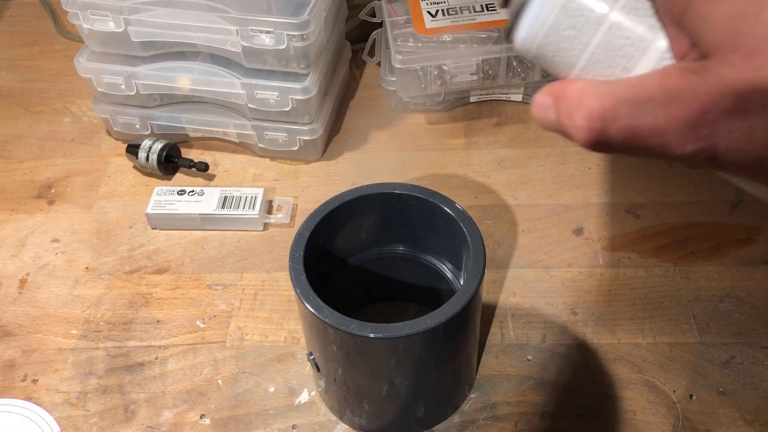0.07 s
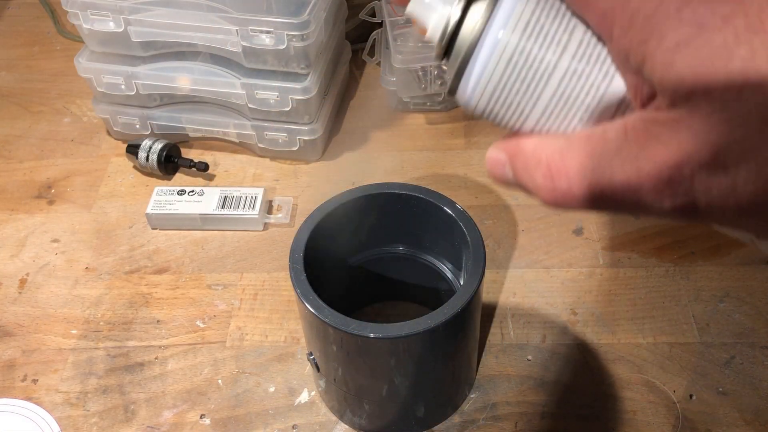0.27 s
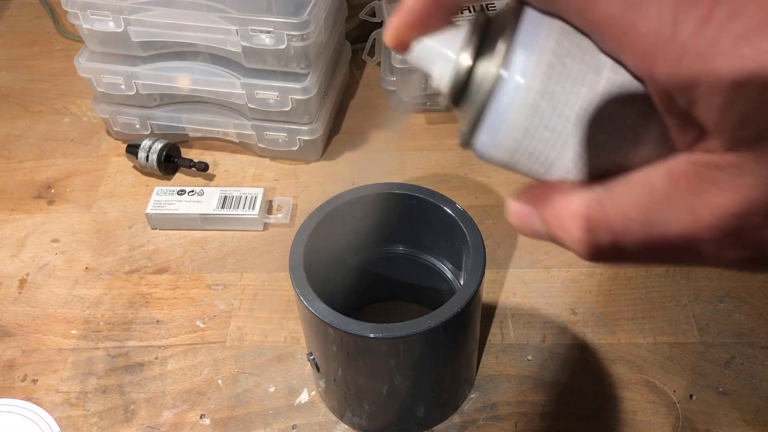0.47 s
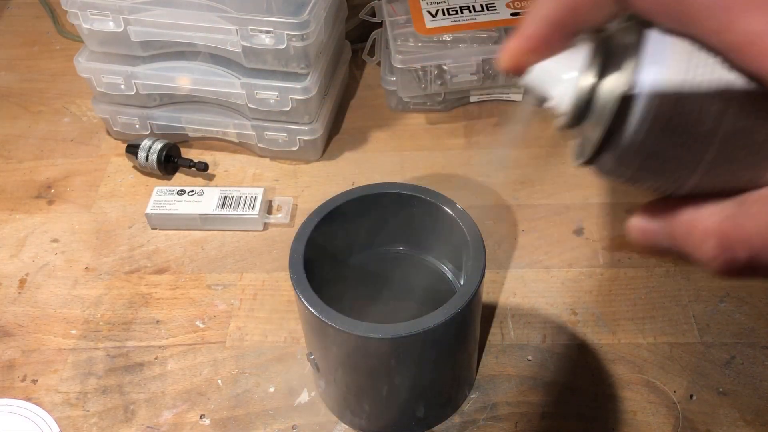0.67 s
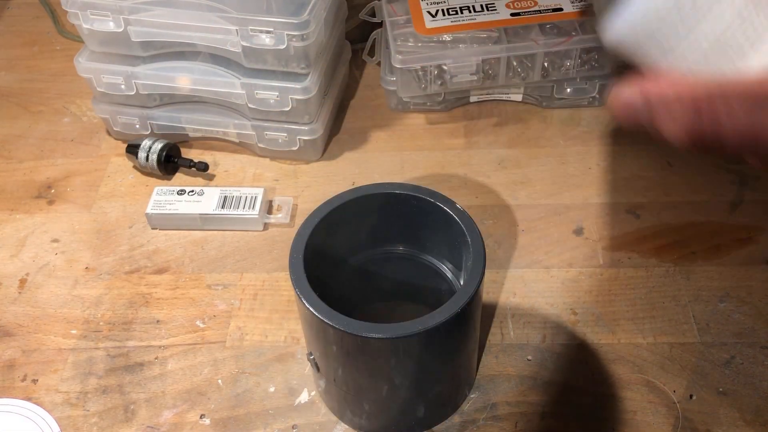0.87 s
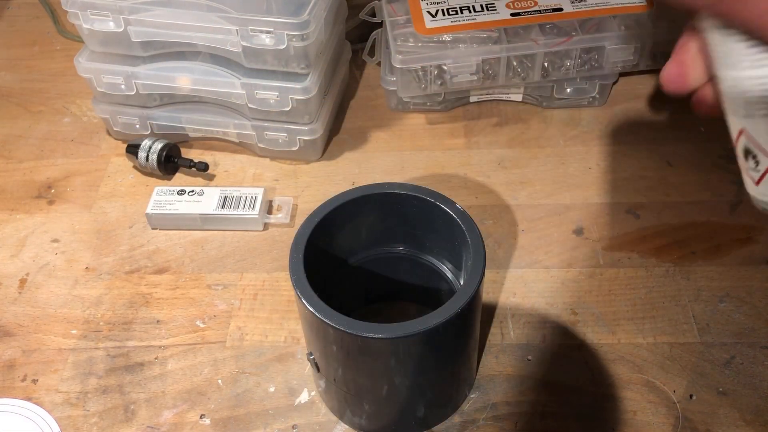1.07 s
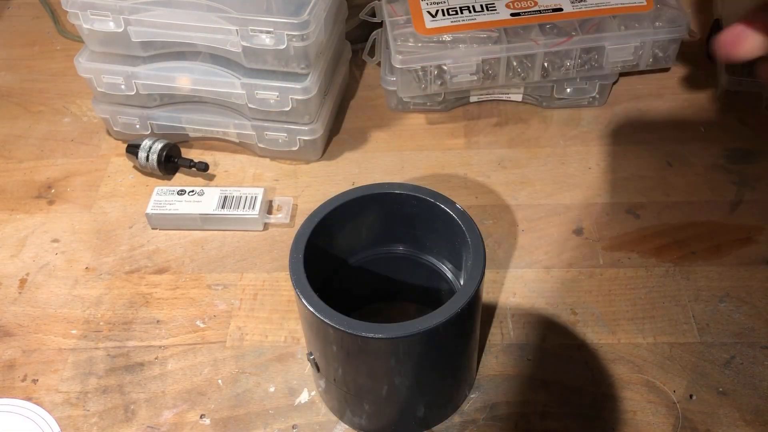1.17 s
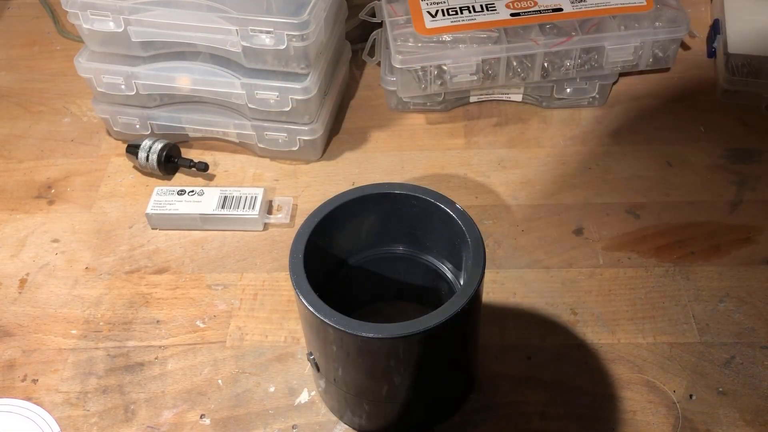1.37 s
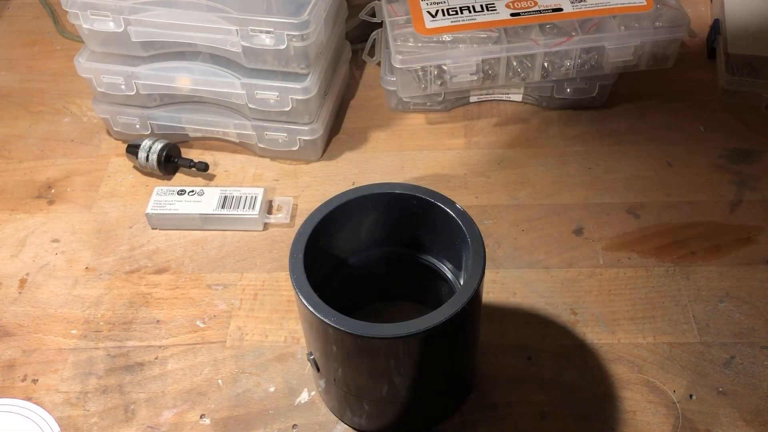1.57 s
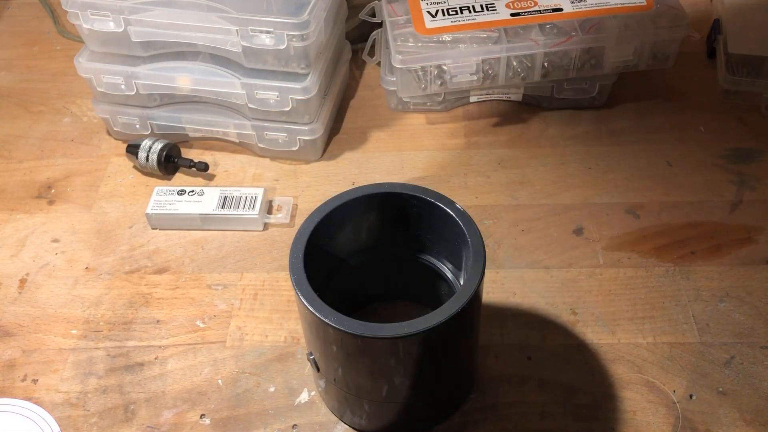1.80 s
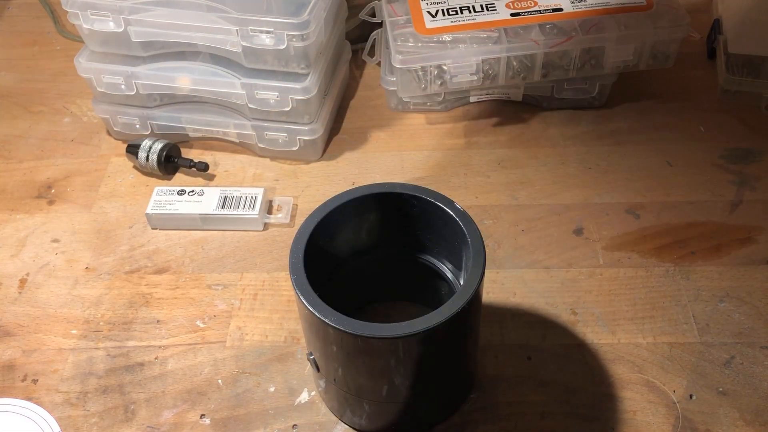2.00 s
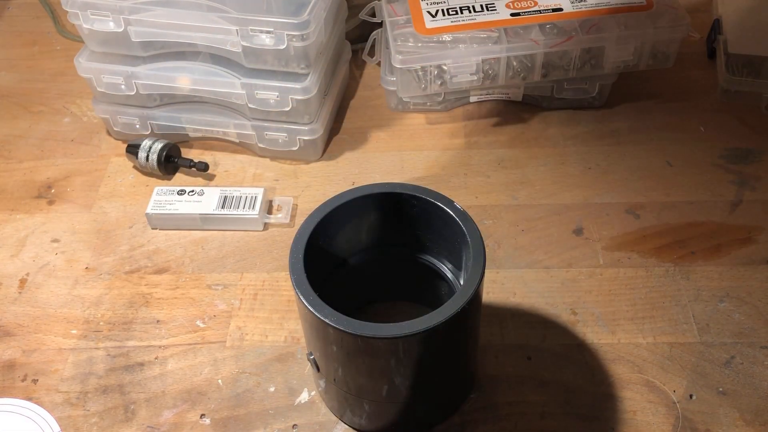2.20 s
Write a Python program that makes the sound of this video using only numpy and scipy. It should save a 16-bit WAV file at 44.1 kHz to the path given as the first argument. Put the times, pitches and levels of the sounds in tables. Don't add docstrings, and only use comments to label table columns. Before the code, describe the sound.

A loud aerosol hiss stops abruptly, followed by faint handling clicks and a can set down

```python
import sys
import numpy as np
from scipy import signal
from scipy.io import wavfile
from scipy.ndimage import uniform_filter1d, map_coordinates

SR = 44100
rng = np.random.default_rng(int(sys.argv[2]) if len(sys.argv) > 2 else 0)


def invert_db(x):
    u = np.asarray(x, float) / 20
    return 10 ** u


def int16_out(signal):
    q = np.round(np.clip(np.atleast_2d(signal).T, -1, 1) * 32767)
    wavfile.write(sys.argv[1], SR, q.astype(np.int16))


N = 99048
T = np.arange(N) / SR


def evened(x):
    return x / np.sqrt(np.mean(x ** 2) + 1e-20)


def read(points, hz):
    f, value = np.transpose(points)
    return np.interp(np.log(hz + 1), np.log(f + 1), value)


def curve(table, t=T):
    rows = np.transpose(table)
    return [np.interp(t, rows[0], col) for col in rows[1:]]


def add(mix, start_s, sound):
    part = mix[round(start_s * SR):][:len(sound)]
    part += sound[:len(part)]


def low_pass(x, order, hz):
    return signal.sosfilt(signal.butter(order, hz, fs=SR, output="sos"), x)


def high_pass(x, hz):
    return signal.sosfilt(signal.butter(2, hz, "high", fs=SR, output="sos"), x)


def resonate(x, hz, width_hz):
    turn = np.exp(2j * np.pi * np.cumsum(hz * np.ones(len(x))) / SR)
    r = np.exp(-np.pi * width_hz / SR)
    return 2 * (turn * signal.lfilter([1 - r], [1, -r], x / turn + 1e-18)).real


def noise(shape_db, patchy_db):
    frames, hz = N // 128 + 5, np.fft.rfftfreq(512, 1 / SR)
    a, b, patches = rng.standard_normal((frames, 257, 3)).T
    patches = uniform_filter1d(patches, size=5, axis=0)
    patches = evened(uniform_filter1d(patches, size=16, axis=1))
    colour_db = shape_db(hz[:, None], np.arange(frames) * 128 / SR)
    z = (a + 1j * b) * invert_db(colour_db + patchy_db * patches)
    return evened(signal.istft(z, nperseg=512, noverlap=384)[1][:N])


def ridges(hz, t):
    # start_s, end_s, from_hz, to_hz, level_db
    slides = [(-.2, .68, 9050, 7500, 4), (-.2, .25, 7760, 7500, -9.5), (-.2, 0.9, 5650, 5400, 4),
              (.2, 1.1, 5460, 5600, -9), (-.2, .32, 12350, 12470, 0.5), (.35, .8, 12250, 12150, -4.5),
              (.35, 0.44, 13070, 12650, 3.5), (.35, 0.66, 13950, 13650, 4.5), (.5, 0.86, 2400, 2700, 8),
              (0.551, 0.72, 3100, 3000, -22), (.6, 1.3, 6700, 6750, 0.5), (.65, 2.3, 9240, 9150, 2),
              (0.051, 0.28, 10000, 10350, 10.5), (.3, 0.87, 3940, 3550, -2.5), (.55, 1.3, 8160, 8500, 4)]
    width_hz = 220
    out = 0
    for start, end, from_hz, to_hz, db in slides:
        u = np.clip((t - start) / (end - start), 0, 1)
        centre_hz = from_hz + (to_hz - from_hz) * u
        swell = np.sqrt(abs(np.sin(np.pi * u)))
        out = out + db * swell * np.exp(-((hz - centre_hz) / width_hz) ** 2)
    return out


def mirror(x, table):
    share, delay_ms = curve(table)
    late = map_coordinates(x, [np.arange(N) - delay_ms * SR / 1000], order=5)
    return share * late, share


def whistle():
    pitch_hz, width_hz, centre_s, length_s = 5150, 320, .852, .005
    level_db, tail_db, t60_s = -31.5, -21, .5
    fuzz = evened(resonate(rng.standard_normal(N), pitch_hz, width_hz))
    since = T - centre_s
    puff = np.exp(-(since / length_s) ** 2) * (np.sin(2 * np.pi * pitch_hz * T) + fuzz / 2)
    tail = fuzz * (since > 0) * invert_db(tail_db - 60 * abs(since) / t60_s)
    return invert_db(level_db) * (puff + tail)


def jet():
    # time_s, level_db, thinning (0 full to 1 thin)
    valve = [
        (0, -27.5, 0),
        (.15, -29.5, 0),
        (.3, -27.5, 0.09),
        (.45, -25, 0.37),
        (.65, -23.5, 0.6),
        (.836, -23.5, 0.53),
        (.856, -26.5, 0.6),
        (.866, -39, 1),
        (.878, -69, 0.6),
        (.89, -100, 0.04),
    ]
    # pitch_hz, level_db (per Hz)
    full_jet = [(35, -50.5), (60, -44.5), (226, 0), (500, -13.5), (796, -4.5), (1080, -12), (4460, -5),
                (8570, 4.5), (14500, 7), (15700, 6)]
    thin_jet = [(35, -48.5), (60, -54), (145, -14.5), (800, -18.5), (1270, -19.5), (2490, -17), (4070, -17),
                (5500, -3.5), (14500, -1), (15700, -3.5)]
    # pitch_hz, width_hz, full_db, thin_db (against the jet)
    pipe = [(134.5, 71, -34.5, -38), (330, 130, -29.5, -36), (4094, 150, -40, -17),
            (5435, 120, -26.5, -46.5), (6140, 120, -28.5, -18)]
    # time_s, share, delay_ms
    bench_path = [(0, .16, .93), (.16, .24, .94), (.3, .2, .95), (.42, .4, 1.01), (.55, .36, 1.03),
                  (.62, .3, 1.03), (.75, .34, 1.0), (.9, .34, .985)]
    rim_path = [(0, .08, 2.44), (.1, .2, 2.44), (.24, .2, 2.46), (.34, .05, 2.3), (.5, .08, 2.94),
                (.62, .2, 2.78), (.75, .16, 2.75), (.9, .05, 2.75)]
    shelf_hz, shelf_slide_hz, shelf_db = 7840, -1500, 1.5
    bass_hz, bass_off_s, bass_fade_s, bass_drop_db = 696, 0.76, 0.0296, -9.5
    wall_hz, wall_db = 3260, 2.5
    level_db, thinning = curve(valve)

    def colour(hz, t):
        thin = np.clip(curve(valve, t)[1], 0, 1)
        shelf = shelf_db / 2 * np.tanh((hz - shelf_hz - shelf_slide_hz * thin) / 150)
        blend = (1 - thin) * read(full_jet, hz) + thin * read(thin_jet, hz)
        return ridges(hz, t) + shelf + blend

    x = noise(colour, patchy_db=1.2)
    white = rng.standard_normal(N)
    hum = np.zeros(N)
    for hz, width, full_db, thin_db in pipe:
        hum += invert_db(full_db + (thin_db - full_db) * thinning) * evened(resonate(white, hz, width))
    x = x + hum
    roar = low_pass(x, 1, bass_hz)
    stopping = np.clip((T - bass_off_s) / bass_fade_s, 0, 1)
    x = x - roar * (1 - invert_db(bass_drop_db * stopping))
    bench, bench_share = mirror(x, bench_path)
    rim, rim_share = mirror(x, rim_path)
    direct = (x + bench + rim) / np.sqrt(1 + bench_share ** 2 + rim_share ** 2)
    dull = low_pass(x - roar, 2, wall_hz)
    return invert_db(level_db) * direct + whistle(), invert_db(level_db) * (x + invert_db(wall_db) * dull)


def knock():
    # pitch_hz, level_db, t60_s
    modes = [(130.6, -21.5, 0.47), (230, -22, 0.37), (300.3, -11.5, 0.18), (370, 2, 0.079),
             (504, -11.5, 0.074), (535.5, -4, 0.073), (790, -6.5, 0.032), (933, -10, .12),
             (1102, -18, 0.055), (1168, -1.5, 0.054), (1296, -17.5, .15), (1417, -13.5, 0.063),
             (1670, -22.5, 0.089), (2120, -17, 0.026)]
    # start_s, level_db
    blows = [
        (2.1523, -23.5),
        (2.181, -50),
    ]
    # pitch_hz, level_db
    board_colour = [(200, -15), (300, 2), (600, -1.5), (1150, -2), (1650, -10), (1900, -36), (2300, -27),
                    (3600, -52)]
    board_db, board_t60_s = -34, 0.17
    crack_db, crack_t60_s, crack_hz = -44, 0.033, 3780
    rise_cycles = 1.2
    out, t = np.zeros(N), T[:8000]
    for start, db in blows:
        vary = rng.uniform(-1.5, 1, (len(modes), 2))
        ring = np.zeros(len(t))
        for (hz, mode_db, t60), (louder, sharper) in zip(modes, vary):
            fade = invert_db(mode_db + 2 * louder - 60 * t / t60)
            rise = 1 - np.exp(-t * hz / rise_cycles)
            ring += fade * rise * np.sin(2 * np.pi * hz * (1 + 0.003 * sharper) * t)
        add(out, start, invert_db(db) * ring)
    crack = signal.lfilter(*signal.butter(2, crack_hz, fs=SR), rng.standard_normal(len(t)))
    crack = invert_db(crack_db - 60 * t / crack_t60_s) * crack
    board = noise(lambda hz, u: read(board_colour, hz) + 0 * u, patchy_db=3.0)[:len(t)]
    board = invert_db(board_db - 60 * t / board_t60_s) * board * np.minimum(t / 0.0022, 1)
    add(out, blows[0][0], crack + board)
    return out


def ticks():
    # start_s, peak_db, pitch_hz, t60_s, brightness_db
    clicks = [(1.0249, -39, 1910, 0.012, -18), (1.03, -64, 2040, 0.27, -24), (1.059, -60, 5400, 0.02, -5),
              (1.36, -58, 3740, 0.058, -4), (1.3659, -42, 2910, 0.022, -12), (1.3675, -48, 6700, 0.03, -13),
              (1.3788, -46, 3160, 0.03, -3.5), (1.3794, -56, 1680, 0.11, -10),
              (1.387, -56, 4120, 0.048, -13), (1.417, -55, 9000, 0.0062, -3), (1.424, -56, 8500, .012, -7),
              (1.436, -61, 9050, .012, -3), (1.594, -54, 1820, 0.045, -34),
              (1.788, -56.5, 4750, 0.033, -0.5), (1.7867, -59, 6680, .025, -26),
              (1.79, -74, 5500, 0.074, -22), (1.7872, -62, 11200, 0.01, -18),
              (1.786, -62, 13600, 0.011, -13), (1.802, -66, 8700, 0.012, -15),
              (1.87, -60, 3900, 0.037, -18), (1.871, -58, 3000, 0.035, -20),
              (2.0058, -64, 1490, 0.018, -22), (2.023, -62, 1800, .03, -28), (2.153, -50, 5450, 0.034, -18)]
    # pitch_hz, level_db
    cap_modes = [(1700, 0), (5000, 4), (6800, -2.5), (9000, -12), (11200, -22), (13600, -17)]
    out, t = np.zeros(N), T[:4000]
    for start, db, hz, t60, bright_db in clicks:
        detune = rng.uniform(0.925, 1.1, len(cap_modes))
        crackle = rng.standard_normal(len(t)) * invert_db(4 * rng.standard_normal(len(t)))
        cap = np.zeros(len(t))
        for (cap_hz, cap_db), ratio in zip(cap_modes, detune):
            cap += invert_db(cap_db) * evened(resonate(crackle, cap_hz * ratio, 425))
        main = 1.18 * np.sin(2 * np.pi * hz * t) + .5 * evened(resonate(crackle, hz, 300))
        fade = invert_db(-60 * t / t60) * np.minimum(t / 0.00045, 1)
        bright = invert_db(bright_db) * (cap + 0.94 * evened(crackle))
        add(out, start, invert_db(db) * fade * (main + bright) / 2)
    return out


def brushes():
    # centre_s, half_width_s, level_db, lowest_hz
    strokes = [(1.291, 0.014, -64, 4500), (1.43, .035, -70, 2500), (1.186, 0.13, -78, 6000),
               (1.778, .006, -72, 4000), (1.81, .008, -75, 4000), (2.021, .006, -73, 3000),
               (1.874, .008, -76, 2500)]
    out = np.zeros(N)
    for centre, half, db, hz in strokes:
        hiss = high_pass(rng.standard_normal(N), hz)
        grain = invert_db(3.0 * evened(uniform_filter1d(rng.standard_normal(N), size=60)))
        out += invert_db(db) * np.exp(-((T - centre) / half) ** 2) * hiss * grain
    return out


def squeak():
    # time_s, pitch_hz, level_db
    path = [(1.32, 12850, -84), (1.345, 12800, -79), (1.375, 12700, -88), (1.43, 12500, -82),
            (1.495, 12250, -82), (1.51, 13000, -80), (1.535, 13650, -82), (1.575, 13500, -80),
            (1.635, 14250, -74), (1.665, 13500, -79), (1.69, 13350, -84), (1.702, 12650, -84),
            (1.72, 12700, -80), (1.78, 12500, -87)]
    # pitch_ratio, level_db
    strands = [(1, 0), (1.055, -3), (1.03, -11), (1.078, -9), (.875, -13), (.8, -12), (.74, -13),
               (.66, -13), (.375, -9)]
    height_s, half_width_s = 1.6, .095
    hz, db = curve(path)
    on = (T > path[0][0]) & (T < path[-1][0])
    out = np.zeros(N)
    for ratio, part_db in strands:
        flicker = evened(uniform_filter1d(rng.standard_normal(N), size=1200))
        swell = 1 if ratio == 1 else np.exp(-((T - height_s) / half_width_s) ** 4)
        tone = evened(resonate(rng.standard_normal(N), hz * ratio, 45))
        out += on * swell * invert_db(db + part_db + 2.6 * flicker) * tone
    return out


def cloth():
    # centre_s, half_width_s, level_db, pitch_hz, width_hz
    rubs = [(1.42, 0.2, -73.5, 446, 49.3), (1.466, 0.0067, -64, 441, 59.5), (1.601, 0.013, -63, 296, 80),
            (1.649, 0.079, -67.5, 418, 70), (1.711, 0.014, -55.5, 307, 118), (1.753, 0.028, -55, 330, 152),
            (1.77, 0.016, -70, 606, 200), (1.829, 0.066, -58.5, 134, 24), (1.812, 0.038, -61.5, 292, 146),
            (1.876, 0.046, -58.5, 286, 150), (1.88, 0.026, -69.5, 1170, 502), (1.9, 0.31, -63, 232.7, 23.6),
            (1.964, 0.015, -60, 245, 81.6), (2.019, 0.023, -56.5, 288, 122),
            (2.017, 0.027, -70.5, 1250, 940), (2.09, 0.24, -77, 230, 41), (2.0, 0.13, -63.5, 133, 40.3)]
    out = np.zeros(N)
    for centre, half, db, hz, width in rubs:
        narrow = resonate(rng.standard_normal(N), hz, width)
        hum = evened(resonate(narrow, hz, 2 * width))
        out += invert_db(db) * np.exp(-((T - centre) / half) ** 2) * hum
    return out


def room(x):
    # pitch_hz, t60_s
    decay = [(150, 0.33), (1000, 0.44), (5000, .5), (10000, 0.36), (15000, 0.31)]
    taps, slots = np.zeros(SR // 2), np.arange(200, SR // 2 - 20, 20)
    taps[slots + rng.integers(0, 20, len(slots))] = rng.choice([-1., 1.], len(slots))
    hz, t, z = signal.stft(taps, SR, nperseg=256)
    fade = invert_db(-60 * t / read(decay, hz)[:, None])
    tail = signal.istft(z * fade, SR, nperseg=256)[1]
    return signal.fftconvolve(x, tail / np.linalg.norm(tail))[:N]


def air():
    # pitch_hz, level_db (per Hz)
    floor = [(18, -38.5), (45, -3.5), (231, -4), (695, -12), (1930, -11), (2600, -17), (5300, -18),
             (6200, -22.5), (15700, -29)]
    level_db, sag_db, sag_s = -67.5, -6, 1.87

    def colour(hz, t):
        when = np.clip((t - sag_s) / 0.08, 0, 1)
        where = np.clip(hz / 2500, 0, 1) * np.clip(2 - hz / 7000, .3, 1)
        return read(floor, hz) + sag_db * when * where

    return invert_db(level_db) * noise(colour, patchy_db=1.3)


def scene():
    hiss, spread = jet()
    small, thud = ticks(), knock()
    wet = room(invert_db(-12) * spread + invert_db(-11) * small + invert_db(-10) * thud)
    loud = high_pass(hiss + thud + wet, 94.6)
    mid = loud + small + air() + brushes() + squeak() + cloth()
    return np.array([mid, mid])


def noise_fill(x):
    # pitch_hz, chance
    fill_loud = [(4100, .97), (5700, .9), (6400, .5), (7600, .25), (8300, .06), (15500, .05)]
    fill_quiet = [(4100, .03), (9000, .06), (10500, .2), (15500, .08)]
    share, edge_hz = 0.66, 15830
    hz, _, z = signal.stft(np.pad(x, ((0, 0), (928, 0))), SR, "cosine", 2048, 1024)
    band = (hz // 690).astype(int)
    power = abs(uniform_filter1d(abs(z[0]) ** 2, size=6, axis=0))
    loud = power[hz > 4000].mean(0) > invert_db(-2 * 85)
    chance = np.where(loud, read(fill_loud, hz)[:, None], read(fill_quiet, hz)[:, None])
    chance = chance * (hz[:, None] > 4140)
    swap = rng.random((z.shape[2], band.max() + 1)).T[band] < chance
    swap &= power < 5 * uniform_filter1d(power, size=80, axis=0)
    a, b = rng.standard_normal(z.shape[::-1] + (2,)).T
    filled = share * (a + 1j * b) * np.sqrt(power) + np.sqrt(abs(1 - share ** 2)) * z
    z = np.where(swap, filled, z) * (hz[:, None] < edge_hz)
    return signal.istft(z, SR, "cosine", 2048, 1024)[1][:, 928:928 + N]


def top_cut(x):
    return signal.sosfilt(signal.butter(12, 16920, fs=SR, output="sos"), x)


def record(dry):
    return top_cut(noise_fill(high_pass(dry, 38)))


dry = scene()
out = record(dry)
int16_out(out)
```